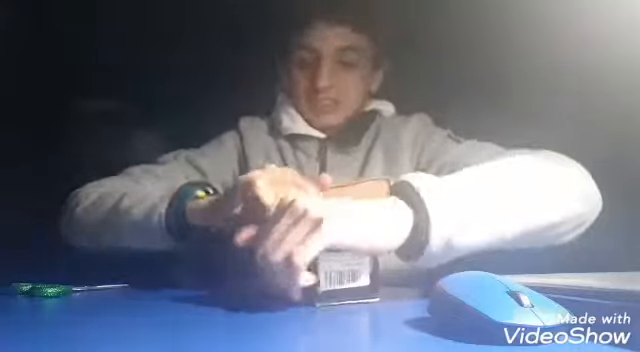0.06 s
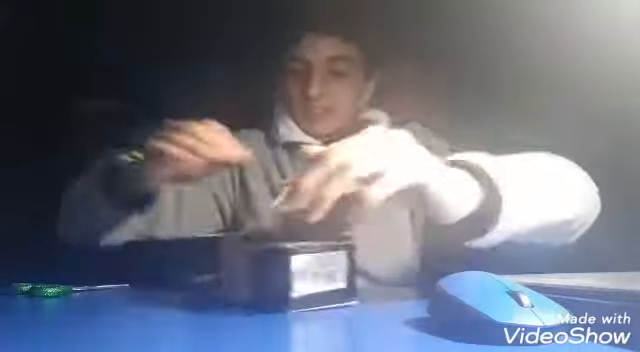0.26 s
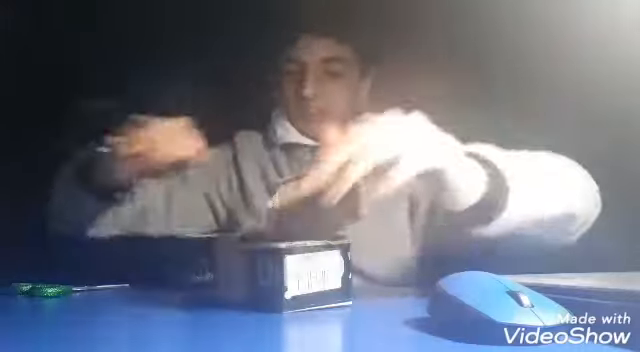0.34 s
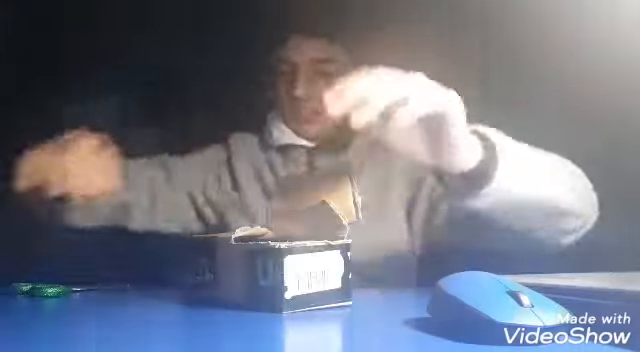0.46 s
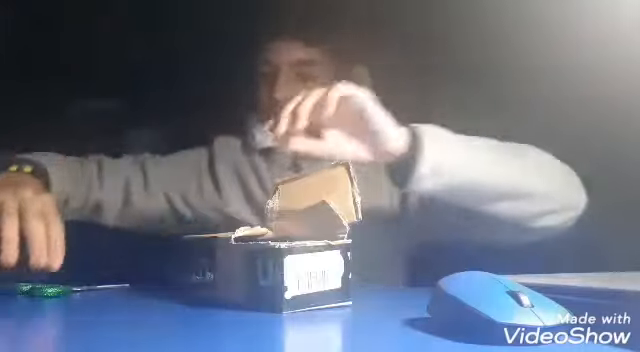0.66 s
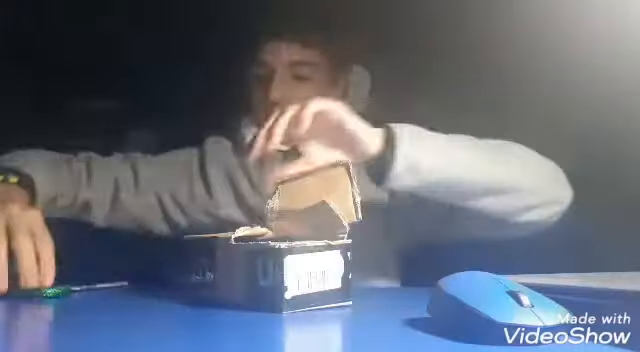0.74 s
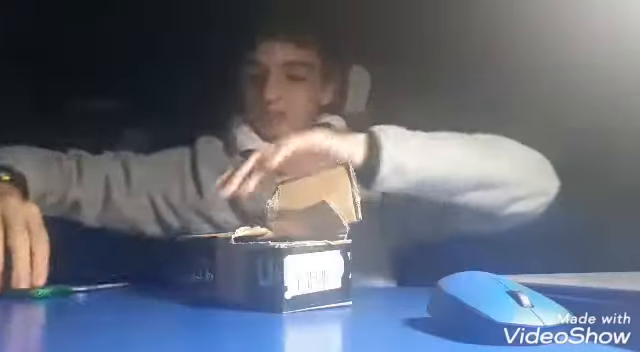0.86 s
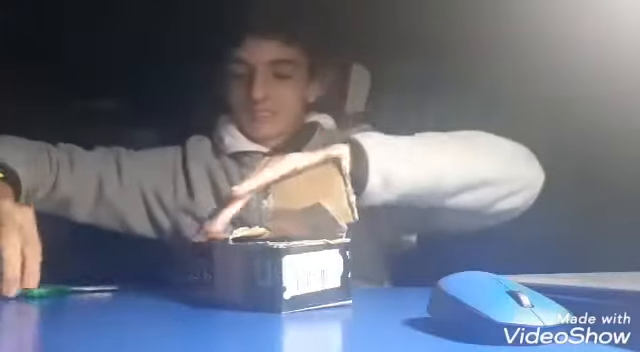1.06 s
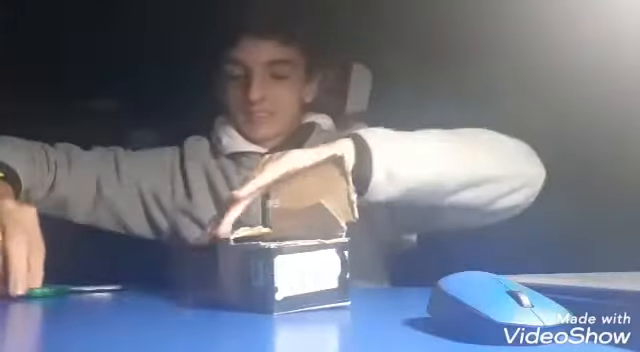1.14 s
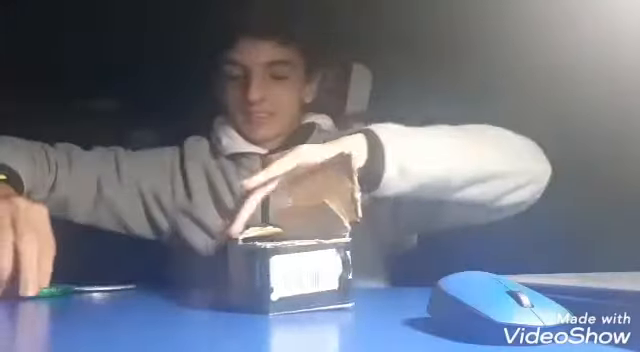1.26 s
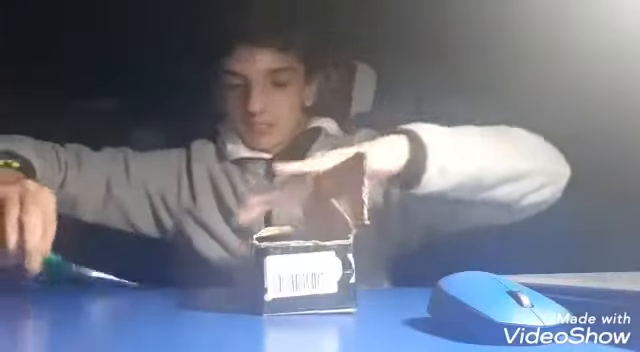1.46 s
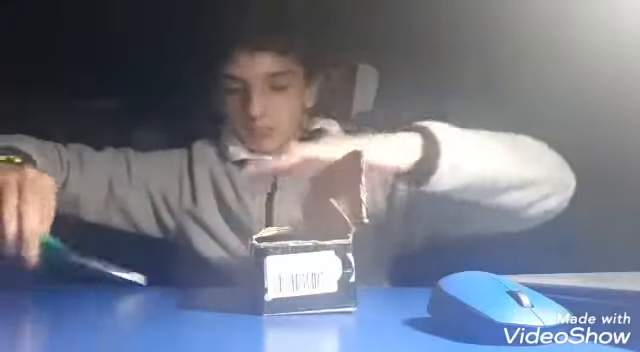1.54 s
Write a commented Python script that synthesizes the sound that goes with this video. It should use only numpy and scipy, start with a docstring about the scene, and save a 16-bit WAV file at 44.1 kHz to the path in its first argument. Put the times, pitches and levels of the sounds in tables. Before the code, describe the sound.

Cardboard is torn open and bumps a table, then a small tool rattles.

```python
"""A small, hard room; a pair of microphones close to a table where a cardboard box is forced open.
Hands rub the card, fibres tick and the lid creaks as it sticks and slips. A quarter second in, it
rips free and buckles, the box thumps the tabletop and a sleeve swishes past. From 0.8 s a hand tool
rattles on the table, a little to the left, while the loose flap is rubbed and bent, snapping a few times."""
import sys
import numpy as np
from scipy import signal
from scipy.fft import rfft, irfft
from scipy.io import wavfile
from scipy.ndimage import map_coordinates

SR = 44100
rng = np.random.default_rng(int(sys.argv[2]) if len(sys.argv) > 2 else 0)


def output_pcm(signal):
    """Save a mono or channel-first signal as 16-bit PCM at the path in sys.argv[1].

    Samples are clipped to [-1, 1] before scaling.
    """
    pcm = np.clip(np.atleast_2d(signal).T, -1, 1) * 32767
    wavfile.write(sys.argv[1], SR, np.round(pcm).astype(np.int16))


N = 70560  # 1.6 s

# hiss of a hand sliding on card, scrape of the box, rumble of hands leaning on it: time_s, level_db
HISS_LEVEL = [(0, -91), (.06, -58.5), (.15, -49), (.235, -43), (.3, -34.5), (.78, -86), (.95, -96),
              (1.07, -86), (1.105, -48.5), (1.16, -58.5), (1.25, -53.5), (1.36, -53), (1.44, -61),
              (1.49, -50.5), (1.56, -52), (1.6, -68)]
SCRAPE_LEVEL = [(0, -68), (.13, -55), (.22, -41), (.3, -50), (.6, -57), (.8, -83), (.83, -38), (.94, -56),
                (1.02, -51), (1.055, -44), (1.12, -48), (1.22, -61.5), (1.3, -53), (1.41, -47), (1.44, -47),
                (1.53, -39), (1.6, -107)]
RUMBLE_LEVEL = [(0, -64), (.08, -66), (.11, -59), (.2, -58), (.5, -53.5), (.78, -79.5), (.83, -53.5),
                (.97, -59.5), (1.1, -48), (1.24, -61.5), (1.29, -50.5), (1.42, -54), (1.6, -54)]
# spectra of that hiss, scrape and rumble: frequency_hz, gain_db
HISS_COLOUR = [(150, -17), (1000, 5.5), (1900, -2.5), (2400, 0.5), (2900, -0.5), (3400, 2), (5000, -0.5),
               (7500, -13), (11000, -14.5), (15000, -35)]
SCRAPE_COLOUR = [(50, -36), (200, -15.5), (330, -3.5), (440, 1.5), (900, 4), (1400, -6.5), (2000, -7.5),
                 (5000, -23.5), (15000, -62.5)]
RUMBLE_COLOUR = [(40, -17), (75, -17), (105, -2.5), (150, 1.5), (190, -6), (270, -3), (450, -25.5),
                 (2000, -62.5)]
# single fibres snapping: start_s, level_db, pitch_hz
FIBRES = [(.005, -24, 6290), (0.0328, -15, 4650), (0.0476, -23, 3900), (0.1444, -16, 5180),
          (0.152, -38.5, 4540), (0.161, -21, 5000), (0.2059, -24.5, 5000), (1.113, -27, 5050)]
# gritty crackle along the tear: time_s, level_db
GRIT_LEVEL = [(.07, -69.5), (.15, -49), (.2, -54.5), (.225, -39.5), (.237, -56.5), (.272, -49),
              (.294, -45.5), (.36, -62.5), (.42, -88.5)]
# spectrum of the grit: frequency_hz, gain_db
GRIT_COLOUR = [(500, -17), (1500, -2.5), (5000, -2), (9000, -0.5), (15000, -6.5)]
# blows of the box on the table: start_s, level_db, contact_s
THUMPS = [(0.095, -38.5, 0.0022), (0.2468, -33, 0.00077), (0.2878, -8.5, 0.00087), (0.2938, -5.5, 0.0039),
          (0.812, -42, 0.0027), (1.079, -45, 0.004), (1.391, -55, 0.00045), (1.52, -41, 0.0034)]
# box and tabletop ringing together: pitch_hz, level_db, t60_s
TABLE_MODES = [(98.3, -8, 0.24), (126.2, -18, 0.38), (169.9, -20.5, 0.33), (262, -13.5, 0.034),
               (359, -6.5, 0.06), (399.5, -13, 0.13), (502, -8, 0.035), (630, -14, 0.18), (1443, -8, 0.15)]
# creaks of card on card: start_s, length_s, first_pitch_hz, last_pitch_hz, level_db
CREAKS = [(0.143, 0.021, 657, 662, -30), (0.163, 0.013, 702, 636, -30), (0.174, 0.022, 713, 625, -28.5),
          (0.205, 0.016, 673, 746, -27.5), (.955, 0.064, 521, 511, -47.5), (1.003, 0.022, 508, 500, -44),
          (1.053, 0.0343, 560.2, 510.5, -35), (1.467, 0.039, 859, 767, -39),
          (1.488, 0.027, 773.7, 802, -33)]
# rips of the lid: start_s, level_db, decay_s, treble_edge_hz, resonance_hz
RIPS = [(0.218, -24, 0.006, 4100, 1500), (0.2479, -17.5, 0.0029, 5020, 4540),
        (0.2519, -10, 0.0023, 4160, 2606), (0.269, -25, 0.005, 4940, 1230), (0.276, -23, 0.016, 2990, 1300),
        (0.2898, -11, 0.0038, 2000, 1420), (0.294, -10.5, 0.0042, 7560, 4460),
        (0.2993, -22.5, 0.028, 4000, 1240), (0.318, -21, 0.0078, 7020, 6700),
        (0.34, -23.5, 0.017, 5030, 2700), (0.386, -31.5, 0.022, 2920, 1320),
        (0.456, -42.5, 0.0024, 2500, 1400)]
# spectrum of tearing card: frequency_hz, gain_db
RIP_COLOUR = [(60, -25), (190, 4.5), (500, 0.5), (900, -3), (1350, -2), (1850, -5.5), (2500, -6.5),
              (3300, -8), (4000, -9.5), (5000, -10.5), (8000, -16.5), (10500, -17.5), (15000, -33.5)]
# patches of card buckling, and some further ringing of the tool after its knocks: start_s, level_db, pitch_hz,
# t60_s
POPS = [(0.2471, -14, 210, 0.023), (0.2526, -4.5, 2420, 0.0054), (.8142, -22.5, 1060, 0.013),
        (1.311, -21.5, 695, 0.037), (1.3104, -29.5, 1158, 0.063), (1.3115, -11, 2900, 0.0026),
        (1.3884, -32, 1800, 0.014), (1.445, -34, 1260, 0.024), (1.512, -6.5, 1320, 0.0038)]
# knocks of the tool on the table: start_s, level_db, tilt_db_per_octave
TOOL_KNOCKS = [(.8142, -19, 10), (.819, -24.5, 7), (.8378, -20, -12), (.8432, -36, 11), (.8573, -22.5, 9),
               (.8625, -39, 5), (.8785, -23.5, 10), (.8995, -28, 14), (.917, -47, 17), (.985, -53, -26),
               (1.004, -43, 10), (1.047, -24, 6), (1.0992, -25, 1), (1.113, -33.5, 13), (1.161, -32.5, 8),
               (1.3103, -20, 8.5), (1.3125, -34.5, -15), (1.330, -33, -4), (1.444, -44.5, 17)]
# ring of the tool against the table: pitch_hz, level_db, t60_s
TOOL_MODES = [(418.8, -16.5, 0.31), (505, -7, 0.12), (543, -8.5, 0.086), (642, -6.5, 0.067),
              (825, -1, 0.0059), (958, -15.5, 0.015), (1110, -2, 0.01), (1395, -29, 0.043),
              (2560, -15.5, 0.0035), (3440, -31, .007), (3860, -36, 0.0081)]
# snaps of the bending flap: start_s, level_db, tilt_db_per_octave
FLAP_SNAPS = [(1.076, -12.5, 3.5), (1.0795, -27.5, -1.5), (1.3892, -18, 5.5), (1.405, -28, 0.5),
              (1.5118, -22.5, -5), (1.5208, -30.5, 5.5), (1.5605, -30.5, 1.5)]
# ring of the flap: pitch_hz, level_db, t60_s
FLAP_MODES = [(266, -16, 0.033), (798, -14.5, 0.1), (1450, -14.5, 0.0098), (1970, -5.5, 0.0076),
              (2280, -4.5, 0.009), (3353, -2, 0.0093), (3960, -14, 0.0053), (5220, -12, 0.0016),
              (8400, -36, 0.0045)]
# reverberation of the room: band_hz, level_db, t60_s
ROOM_BANDS = [(62, 1.5, 0.043), (132, -8, 0.47), (300, -2, 0.38), (720, -8.5, 0.42), (1483, -8.5, 0.33),
              (2470, -10.5, 0.87), (3100, -14.5, 0.66), (4320, -8, 0.74), (7000, -3, 0.26),
              (14000, -3.5, 0.12)]
# spectrum of the room tone: frequency_hz, gain_db
ROOM_TONE = [(25, -17.5), (110, -6), (500, -14.5), (1500, 4), (2700, -11.5), (5000, -24.5),
             (9000, -41), (15000, -39)]
# places as the microphones hear them: left_over_right_db, left_delay_s, reflections_db
BOX_AT, TABLE_AT, TOOL_AT = (-1.7, -0.000031, 0.8), (-.3, 0, 0.87), (0.55, 0.00021, -0.86)
FLAP_AT, FIBRE_AT = (-2, 0.000097, 0), (-6, .0001, -7.5)


def undb(db):
    """Decibels to gain."""
    return 10 ** (np.asarray(db) / 20)


def unit(x):
    """Scale to rms 1."""
    return x / np.sqrt(np.mean(x ** 2))


def since(start):
    """Seconds since a moment, zero before it."""
    return np.maximum(np.arange(N) / SR - start, 0)


def fade(start, decay_s):
    """Sudden onset and exponential decay."""
    age = since(start)
    return (age > 0) * np.exp(-age / decay_s)


def curve(points):
    """Gain along (time_s, level_db) points."""
    return undb(np.interp(since(0), *np.array(points).T))


def colour(x, points):
    """Causal filter through (frequency_hz, gain_db) points; white noise keeps its level."""
    hz, db = np.array(points).T
    bins_hz = np.arange(2049) * SR / 4096 + 1
    gain = unit(undb(np.interp(np.log(bins_hz), np.log(hz), db)))
    cepstrum = irfft(np.log(gain))
    cepstrum[1:2048] *= 2  # fold to minimum phase
    cepstrum[2049:] = 0
    return signal.fftconvolve(x, irfft(np.exp(rfft(cepstrum))))[:len(x)]


def filtered(x, kind, hz, order=2):
    """Butterworth low-, high- or band-pass."""
    return signal.sosfilt(signal.butter(order, hz, kind, fs=SR, output="sos"), x + 1e-18)


def walk(rate_hz):
    """Random wander with a spread near 1."""
    return np.interp(since(0) * rate_hz, np.arange(N), rng.standard_normal(N))


def crackle(grain):
    """Noise broken into tiny grains of uneven strength."""
    return unit(rng.standard_normal(N) * np.exp(np.clip(grain * walk(1500), -2, 2)))


def ring(modes, tilt_db=0):
    """Damped modes after one blow; a harder blow tilts them towards the treble."""
    t = np.arange(N // 3) / SR
    pitches, levels, _ = np.array(modes).T
    centre_hz = np.exp(np.average(np.log(pitches), weights=undb(levels)))
    out = 0
    for hz, db, t60 in modes:
        gain = undb(db + tilt_db * np.log2(hz / centre_hz))
        out += gain * np.sin(2 * np.pi * hz * t) * np.exp(-np.log(1000) * t / t60)
    return out


def strikes(events, modes, clatter_db, clatter_s):
    """Each contact is one push and a brief clatter, both ringing the object."""
    out = np.zeros(N)
    for start, db, tilt_db in events:
        force = undb(clatter_db) * rng.standard_normal(N) * fade(start, clatter_s)
        force[int(start * SR)] += 1
        out += undb(db) * signal.fftconvolve(force, ring(modes, tilt_db))[:N]
    return out


def rubbing(flutter_db=2):
    """Grainy friction: a hiss from the card's surface, a scrape from its walls and a low rumble."""
    layers = [(HISS_LEVEL, HISS_COLOUR), (SCRAPE_LEVEL, SCRAPE_COLOUR), (RUMBLE_LEVEL, RUMBLE_COLOUR)]
    out = np.zeros(N)
    for level, spectrum in layers:
        friction = crackle(grain=.35) * curve(level) * undb(flutter_db * walk(73))
        out += colour(friction, spectrum)
    return out


def fibres(band_ratio=1.215, crack_db=-24.5):
    """Crisp ticks of fibres giving way: a millisecond of cracking, strongest around one pitch."""
    out = np.zeros(N)
    for start, db, hz in FIBRES:
        crack = rng.standard_normal(N) * fade(start, decay_s=.0006)
        tick = filtered(crack, "band", (hz / band_ratio, hz * band_ratio))
        out += undb(db) * 2 * (tick + undb(crack_db) * crack)
    return out


def grit(clicks_per_s=900, scatter_db=5):
    """Sparse, bright clicks of single fibres parting along the tear."""
    clicks = (rng.random(N) < clicks_per_s / SR) * rng.choice([-1, 1], N)
    strength = undb(scatter_db * np.clip(rng.standard_normal(N), -2, 2))
    return colour(unit(clicks * strength) * curve(GRIT_LEVEL), GRIT_COLOUR)


def thumps():
    """The box pushes on the tabletop; a longer contact gives a duller boom."""
    force = np.zeros(N)
    for start, db, contact_s in THUMPS:
        push = np.sin(np.pi * np.minimum(since(start) / contact_s, 1)) ** 2
        force -= undb(db) * push / push.sum()
    return signal.fftconvolve(force, ring(TABLE_MODES))[:N]


def creaks(jitter=.05, overtone_step_db=-13.5, rough_db=2, edge_s=0.0056):
    """Card sticks and slips on card at an unsteady rate."""
    out = np.zeros(N)
    for start, length, first_hz, last_hz, db in CREAKS:
        age = since(start)
        slip_hz = np.interp(age, [0, length], [first_hz, last_hz]) * (1 + jitter * walk(500))
        phase = 2 * np.pi * np.cumsum(slip_hz * (age > 0)) / SR
        wave = sum(undb(overtone_step_db * k) * np.sin((k + 1) * phase) for k in range(4))
        gate = np.clip(np.minimum(age, length - age) / edge_s, 0, 1)
        out += undb(db + rough_db * walk(400)) * wave * gate
    return out


def rips(resonance_db=1.5):
    """The lid tears in quick bursts of breaking fibres, each ringing the piece of card that comes free."""
    out = np.zeros(N)
    for start, db, decay_s, edge_hz, ring_hz in RIPS:
        burst = filtered(crackle(grain=.4) * fade(start, decay_s), "low", edge_hz, order=1)
        resonance = signal.lfilter(*signal.iirpeak(ring_hz, Q=4.37, fs=SR), burst)
        out += undb(db) * (burst + undb(resonance_db) * resonance)
    return colour(out, RIP_COLOUR)


def pops(rise_s=0.0004):
    """A short ring at one pitch: a patch of card buckling at a pitch set by its size, or the tool ringing on
    after a knock."""
    out = np.zeros(N)
    for start, db, hz, t60 in POPS:
        age = since(start)
        envelope = (1 - np.exp(-age / rise_s)) * fade(start, t60 / np.log(1000))
        out -= undb(db) * envelope * np.sin(2 * np.pi * hz * age)
    return out


def sleeve(peak_s=0.5, width_s=.13, centre_hz=4000, level_db=-60):
    """Cloth brushes past in one soft, high swell as the arm swings away."""
    swell = np.exp(-((since(0) - peak_s) / width_s) ** 2)
    cloth = signal.lfilter(*signal.iirpeak(centre_hz, Q=1.5, fs=SR), rng.standard_normal(N))
    return undb(level_db) * swell * unit(cloth)


def tool_rattle():
    """The tool knocks and rings against the table; being small, it radiates little bass."""
    knocks = strikes(TOOL_KNOCKS, TOOL_MODES, clatter_db=-31, clatter_s=.007)
    return filtered(knocks, "band", (654, 1940))


def flap_snaps():
    """The loose flap snaps as it bends, and the card rings briefly."""
    snaps = strikes(FLAP_SNAPS, FLAP_MODES, clatter_db=-33, clatter_s=.004)
    return filtered(snaps, "band", (97, 5400))


def room_tail(delay_s=0.0062, shared_below_hz=480):
    """The room's echo, each band with its own decay; both microphones get nearly the same bass."""
    hz = np.arange(N // 2 + 1) * SR / N + 1
    likeness = 1 / (1 + (hz / shared_below_hz) ** 2)
    mid, side = rfft(rng.standard_normal((2, N)))
    mid, side = mid * np.sqrt(1 + likeness), side * np.sqrt(1 - likeness)
    pair = np.array([mid + side, mid - side]) / np.sqrt(2)
    centres_hz = [row[0] for row in ROOM_BANDS]
    tail = 0
    for share, (_, db, t60) in zip(np.eye(len(ROOM_BANDS)), ROOM_BANDS):
        band = np.interp(np.log(hz), np.log(centres_hz), share)
        decay_s = t60 / np.log(1000)
        envelope = fade(delay_s, decay_s) * np.sqrt(2 / (decay_s * SR))  # unit energy
        tail += undb(db) * irfft(pair * band, N) * envelope
    return tail


def early_reflections(delay_s=0.00061, level_db=-2.5):
    """A few milliseconds of scatter off the table, arms and box, different at each microphone."""
    scatter = rng.standard_normal((2, N)) * fade(delay_s, decay_s=0.0018)
    scatter = filtered(scatter, "band", (974, 10500))
    return undb(level_db) * scatter / np.linalg.norm(scatter, axis=1, keepdims=True)


def place(x, where, tail):
    """Direct sound on the two microphones plus the room's answer."""
    pan_db, lag_s, reflections_db = where
    left = map_coordinates(x, [np.arange(N) - lag_s * SR], mode="nearest")
    reflected = signal.fftconvolve(x[None], tail + early_reflections(), axes=1)[:, :N]
    balance = undb([[pan_db / 2], [-pan_db / 2]])
    return (np.array([left, x]) + undb(reflections_db) * reflected) * balance


def scene():
    """Table near the centre, card to the right, tool a little to the left, over faint room tone."""
    tail = room_tail()
    tool, flap = tool_rattle(), flap_snaps()
    room_tone = undb(-78) * np.array([colour(rng.standard_normal(N), ROOM_TONE) for _ in range(2)])
    return (place(rips() + creaks() + rubbing() + sleeve(), BOX_AT, tail)
            + place(thumps(), TABLE_AT, tail)
            + place(tool, TOOL_AT, tail)
            + place(flap + pops(), FLAP_AT, tail)
            + place(fibres() + grit(), FIBRE_AT, tail)
            + room_tone)


def record(dry):
    """The recorder cuts the deep bass, rounds the highest peaks and cuts the top."""
    low_cut_hz, ceiling, top_hz = 66, .9, 15800
    thin = filtered(dry, "high", low_cut_hz)
    rounded = thin / (1 + (thin / ceiling) ** 6) ** (1 / 6)
    return signal.sosfilt(signal.ellip(8, .2, 70, top_hz, fs=SR, output="sos"), rounded)


dry = scene()
out = record(dry)
output_pcm(out)
```